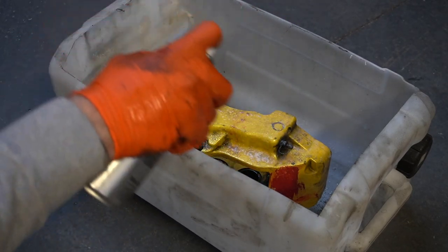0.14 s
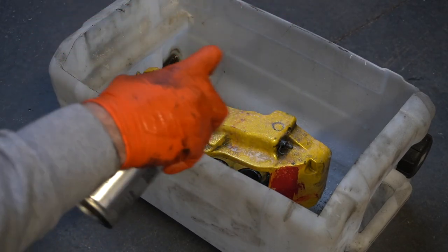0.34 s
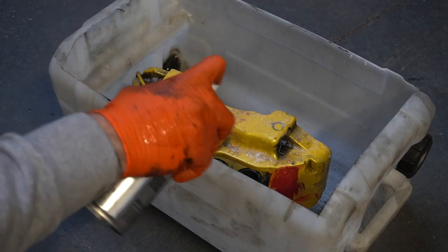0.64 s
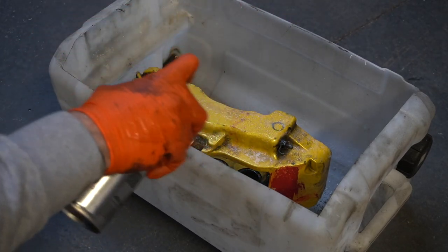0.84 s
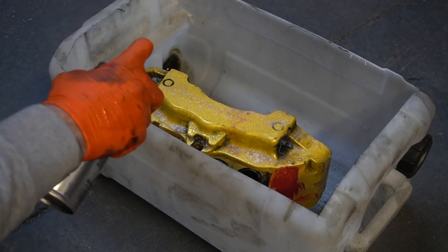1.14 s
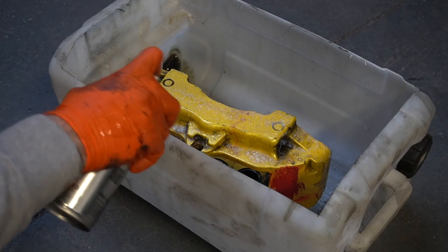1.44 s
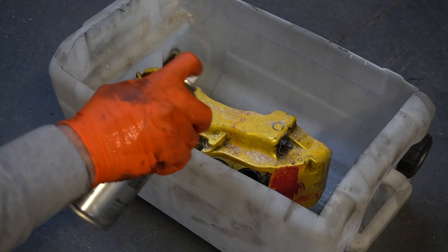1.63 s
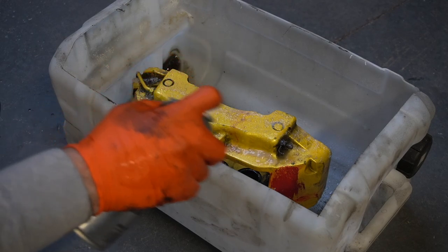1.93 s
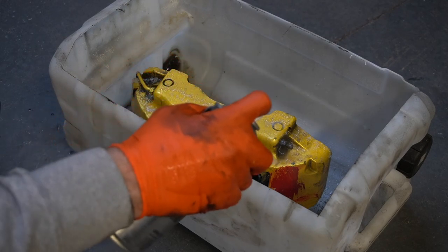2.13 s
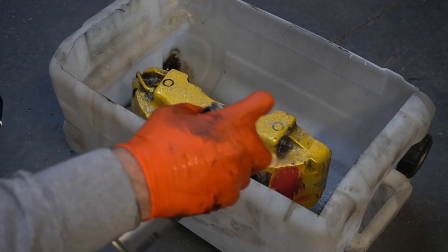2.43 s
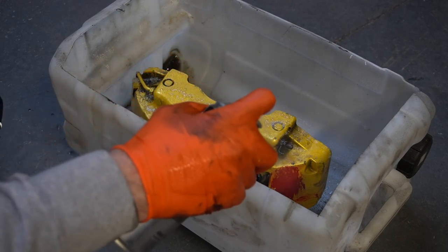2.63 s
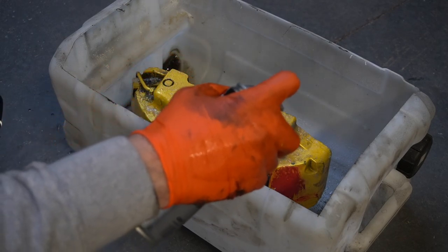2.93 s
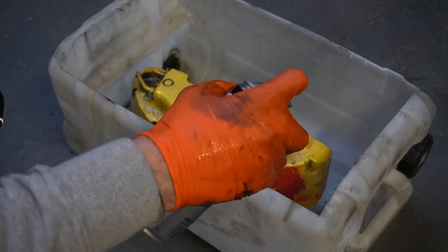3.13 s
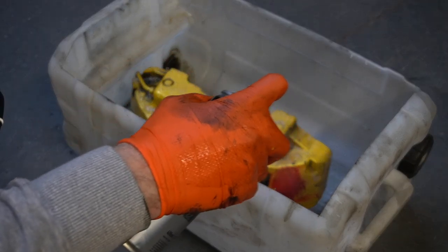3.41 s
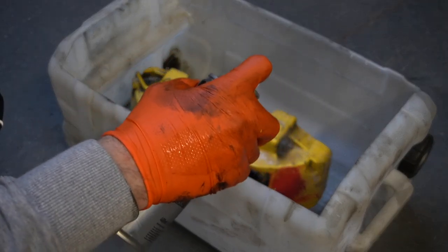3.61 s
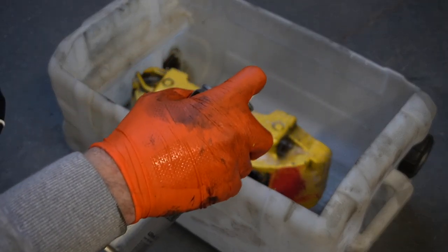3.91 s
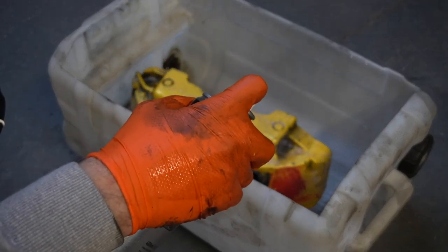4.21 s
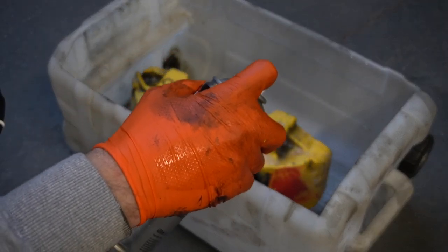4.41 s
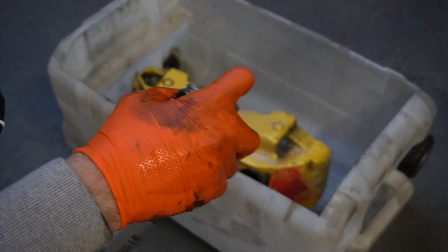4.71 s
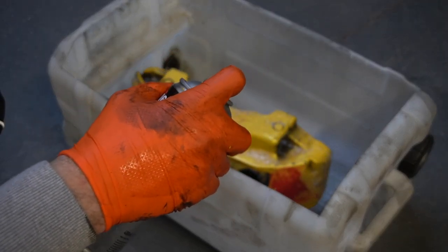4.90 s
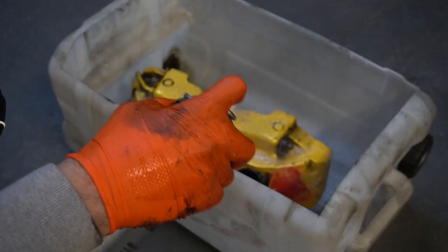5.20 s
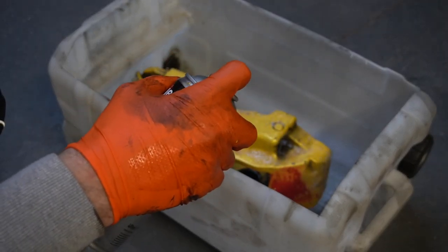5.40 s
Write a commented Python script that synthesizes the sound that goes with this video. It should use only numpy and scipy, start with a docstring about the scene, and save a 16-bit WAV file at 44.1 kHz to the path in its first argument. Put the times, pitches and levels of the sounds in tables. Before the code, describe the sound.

Close up in a small, quiet garage, an aerosol can sprays a metal brake caliper lying in a plastic tub. About twenty short bursts follow one another, roughly four a second, spacing out near the end. Each is a bright hiss with a slightly hollow rush and a brief room echo. The spray drifts from slightly left towards the centre over faint room air.

```python
"""A small, quiet garage; a stereo microphone pair close to a brake caliper lying in a plastic tub.
Over faint room air, an aerosol can of paint stripper starts dabbing, a little to the left: 22 short bursts.
In each, the can rings, the nozzle hisses, the jet rushes on the metal, and the garage rings on.
The tub walls return the sound along paths that shift as the hand sweeps towards the centre. Just after 2 s
the jet crosses a recess and the nozzle spits once; a low rumble swells under the last bursts."""
import sys
import numpy as np
from scipy import signal
from scipy.fft import rfft, irfft, next_fast_len
from scipy.io import wavfile
from scipy.ndimage import uniform_filter1d

SR = 44100
rng = np.random.default_rng(int(sys.argv[2]) if len(sys.argv) > 2 else 0)


def inscribe(sig):
    """Save sig as 16-bit PCM at rate SR to the path in sys.argv[1].

    A 1-D sig is mono; a 2-D sig holds one channel per row.
    Samples are clipped to [-1, 1] before scaling.
    """
    pcm = np.round(np.clip(np.atleast_2d(sig).T, -1, 1) * 32767)
    wavfile.write(sys.argv[1], SR, pcm.astype(np.int16))


N = 244755
TIME = np.arange(N) / SR
FREQ = np.maximum(np.arange(N // 2 + 1) * SR / N, 1)
LEFT_RIGHT = np.array([[1], [-1]])

# presses of the nozzle: valve opens t/s, valve closes t/s, level/dB
PRESSES = [(0.02, 0.133, -38.5), (0.3, 0.489, -39.5), (0.581, .713, -38.5), (0.81, 0.951, -39),
           (1.051, 1.172, -38.5), (1.246, 1.357, -38.5), (1.456, 1.568, -39.5), (1.758, 1.871, -39),
           (2.034, 2.166, -40), (2.365, 2.478, -40), (2.581, 2.67, -38.5), (2.77, 2.872, -39),
           (2.963, 3.084, -38), (3.194, 3.309, -38), (3.392, 3.504, -39), (3.605, 3.699, -38.5),
           (3.976, 4.081, -41.5), (4.235, 4.335, -40), (4.466, 4.584, -39), (4.675, 4.786, -38),
           (5.186, 5.29, -41.5), (5.466, 5.568, -39.5)]
# spectrum of the spray at the nozzle: f/Hz, level/dB
NOZZLE_SPECTRUM = [(700, -65), (1500, -24.5), (3000, -15.5), (4500, -11), (6200, -4.5), (8000, -1),
                   (10000, 0.2), (12500, -0.9), (14000, -2), (15200, 3.5), (16000, 0.5)]


def undb(db):
    """Decibels to gain."""
    return 10 ** (np.asarray(db) / 20)


def curve(points):
    """Gain per frequency from rows of f/Hz, level/dB, joined on a log axis."""
    hz, db = np.transpose(points)
    return undb(np.interp(np.log(FREQ), np.log(hz), db))


def hump(hz, width_hz):
    """Gain of a resonance, 1 at its centre."""
    return 1 / (1 + ((FREQ - hz) / width_hz) ** 2)


def noise(gain):
    """Noise of rms 1, shaped by a gain per frequency."""
    x = irfft(rfft(rng.standard_normal(N)) * gain, N)
    return x / x.std()


def flutter(rate_hz):
    """Smooth random wander of rms 1, up to about rate_hz."""
    return noise(1 / (1 + (FREQ / rate_hz) ** 4))


def filtered(x, gain):
    """A sound through a gain per frequency, padded with silence."""
    size = next_fast_len(N + SR // 4)
    freq = np.arange(size // 2 + 1) * SR / size
    return irfft(rfft(x, size) * np.interp(freq, FREQ, gain), size)[:N]


def room_tone(air_db=-75, wide_hz=3500, deep_db=-87, upper_db=-83):
    """Room air and microphone hiss over a faint rumble that wavers and swells, most in its deepest part."""
    # noise floor of the garage: f/Hz, level/dB
    floor_spectrum = [(20, -25), (45, -34), (85, -1.5), (150, 1.5), (230, -4.5), (400, -3.5), (650, -10),
                      (1200, -14), (4000, -16.5), (10000, -8.5), (16000, -17.5)]
    # swells of the deep rumble: middle t/s, half length/s, rise/dB
    swells = [(.8, 0.14, 6), (5.17, 0.45, 9)]
    colour = curve(floor_spectrum)
    side = filtered(noise(colour), 1.6 * np.sqrt(FREQ / (FREQ + wide_hz)))
    swell_db = sum(db * np.exp(-((TIME - at) / length) ** 2) for at, length, db in swells)
    rumble = undb(deep_db + swell_db) * noise(hump(hz=86, width_hz=20))
    rumble += undb(upper_db + 0.32 * swell_db) * noise(hump(hz=205, width_hz=60))
    air = undb(air_db) * (noise(colour) + LEFT_RIGHT * side)
    return air + rumble * undb(-0.6 * flutter(15))


def valve(opens, closes, first_share, build_s, shut_s, snap_s=0.0014, ease_s=0.0029):
    """Flow of one press: the valve snaps open, the jet builds, then the stem runs empty."""
    age = TIME - opens
    snap = 0.5 + 0.5 * np.tanh(age / (2 * snap_s))
    build = 1 - (1 - first_share) * np.exp(-np.maximum(age, 0) / build_s)
    since_closing = ease_s * np.logaddexp(0, (TIME - closes) / ease_s)
    return snap * build * np.exp(-since_closing / shut_s)


def can_ring(leak_db=-26, vary_db=2, lead_s=0.0062, leak_s=0.015):
    """Gas slips through just before the valve opens and rings the can briefly, more on some presses."""
    leak = 0
    for opens, _, db in PRESSES:
        gain = undb(db + leak_db + vary_db * rng.standard_normal())
        leak += gain * valve(opens - lead_s, opens, first_share=1, build_s=leak_s, shut_s=leak_s)
    return leak * noise(hump(hz=2270, width_hz=300))


def flow(first_share, build_s, shut_s):
    """Strength of the jet over time: every press follows the same valve law."""
    return sum(undb(db) * valve(opens, closes, first_share, build_s, shut_s)
               for opens, closes, db in PRESSES)


def hand_place():
    """Where the hand holds the can at each moment, in metres."""
    # the hand's sweep: t/s, place along the tub/m
    waypoints = [(0, .01), (.25, .13), (.5, .06), (.75, .1), (1.2, 0), (1.75, .08), (2.25, .19),
                 (3.25, .22), (4, .16), (4.5, .19), (4.75, .15), (5.55, .14)]
    return np.interp(TIME, *np.transpose(waypoints))


def droplets(per_second=2500, size_spread=0.38):
    """Tiny ticks of liquid breaking up and landing; rms 1."""
    ticks = (rng.random(N) < per_second / SR) * rng.standard_normal(N)
    ticks *= np.exp(size_spread * rng.standard_normal(N))
    patter = filtered(ticks, curve(NOZZLE_SPECTRUM))
    return patter / patter.std()


def nozzle_hiss(over_middle, gas_db=-0.83, drops_db=-7.5, sizzle_db=-11):
    """Gas and droplets hiss from the nozzle; at the tub's end the jet also sizzles."""
    sizzle_gain = undb(sizzle_db + 2 * flutter(3.1)) * (1 - over_middle)
    sizzle = sizzle_gain * noise(hump(hz=12900, width_hz=800))
    gas = undb(gas_db) * noise(curve(NOZZLE_SPECTRUM))
    hiss = gas + undb(drops_db) * droplets() + sizzle
    return flow(first_share=0.31, build_s=0.028, shut_s=0.016) * hiss


def hollow_rush(over_middle, rush_db=-12.5, middle_rise_db=2.5, between_db=-3.5, wander_db=1.6):
    """The jet rushes in the resonances of tub and cupped hand; each comes and goes with the can's aim."""
    # spectrum of the rush: f/Hz, level/dB
    rush_spectrum = [(600, -23.5), (950, -9), (1300, -6.5), (1900, 0), (2700, -2), (3500, -4), (6000, -11),
                     (9000, -12.5)]
    # hollow resonances: f/Hz, width/Hz, level at the tub's end/dB, level over its middle/dB
    resonances = [(1230, 114, 2, -6.5), (1398, 98, 4, 3), (1534, 127, 1.5, 1), (2040, 200, 3, -19),
                  (2313, 150, 1, 6), (2858, 187, 4, 2.5), (3348, 230, 7, 5.5), (3940, 360, 2, -1.5),
                  (4490, 500, 9, 7), (4986, 190, 12.5, 10), (5740, 240, 10, 5.5)]
    colour = curve(rush_spectrum)
    rush = undb(between_db) * np.linalg.norm(colour) * noise(colour)
    for hz, width_hz, end_db, middle_db in resonances:
        band = colour * hump(hz, width_hz)
        db = end_db + (middle_db - end_db) * over_middle + wander_db * flutter(6.4)
        rush += undb(db) * np.linalg.norm(band) * noise(band)
    rush *= undb(rush_db + middle_rise_db * over_middle) / rush.std()
    return flow(first_share=0.29, build_s=0.037, shut_s=0.012) * rush


def metal_splash(splash_db=-32):
    """Liquid lands on the caliper with a low splash, slower to build and fade than the hiss."""
    # spectrum of the splash: f/Hz, level/dB
    splash_spectrum = [(100, -30), (220, 8), (370, 1.5), (470, 4), (660, -2.5), (900, -3), (2000, -15)]
    splash = undb(splash_db) * noise(curve(splash_spectrum))
    return flow(first_share=0.24, build_s=0.084, shut_s=0.04) * splash


def spray(end_m=0.072, middle_m=0.15, sputter_db=0.5, waver_db=0.47):
    """Hiss, rush and splash waver together as gas and liquid leave the nozzle unevenly."""
    over_middle = np.clip((hand_place() - end_m) / (middle_m - end_m), 0, 1)  # 0 at the tub's end
    jet = nozzle_hiss(over_middle) + hollow_rush(over_middle) + metal_splash()
    return jet * undb(sputter_db * flutter(300) + waver_db * flutter(27))


def tub_echoes(jet, echo_db, nearest_s, farthest_s, fade_s, port_s, sweep, count, oversample=8):
    """Direct sound plus echoes off tub, metal and floor; the hand shifts their paths, moving the comb."""
    travel_s = uniform_filter1d(hand_place(), SR // 10) / 343  # sound travels at 343 m/s
    fine = signal.resample_poly(jet, oversample, 1)
    scatter, lean = rng.random((count, 2)).T
    delays = nearest_s * (farthest_s / nearest_s) ** ((np.arange(count) + scatter) / count)
    gains = np.exp(-delays / fade_s)
    gains *= undb(echo_db) / np.linalg.norm(gains)
    bearings = rng.permutation(np.linspace(-1, 1, count))
    pair = np.array([jet, jet])
    for delay, gain, bearing, slant in zip(delays, gains, bearings, 2 * lean - 1):
        # an echo from the side reaches one microphone port a moment before the other
        lag = delay + sweep * slant * travel_s + LEFT_RIGHT * bearing * port_s / 2
        index = ((TIME - lag) * SR * oversample).astype(int)
        pair += gain * fine[np.clip(index, 0, len(fine) - 1)]
    return pair / np.hypot(1, undb(echo_db))


def garage_ring(jet, wet_db=-8.5, gap_s=0.0083, wide_hz=4000, dull_hz=14000, spread=1.77, size=32768):
    """Diffuse ring of the room: longest in the middle range, shorter and wider in the treble."""
    # reverberation of tub and garage: f/Hz, t60/s, level/dB
    bands = [(302, 0.55, 1.5), (1100, 0.45, 4.5), (1660, 0.48, 5), (2160, 0.6, -1.5), (4900, 0.5, 0),
             (10100, 0.4, -3.5), (15000, 0.39, -5.5)]
    t = np.arange(size) / SR
    freq = np.maximum(np.arange(size // 2 + 1) * SR / size, 1)
    mid, side = rfft(rng.standard_normal((2, size)))
    width = spread * freq / np.hypot(freq, wide_hz)
    field = (mid + LEFT_RIGHT * width * side) / np.hypot(1, freq / dull_hz)
    onset = np.clip(t / gap_s - 1, 0, 1)
    log_centres = np.log(np.array(bands)[:, 0])
    response = 0
    for (_, t60, db), this_band in zip(bands, np.eye(len(bands))):
        band = np.interp(np.log(freq), log_centres, this_band)
        decay = onset * np.exp(-np.log(1000) * t / t60)
        response += undb(db) * irfft(field * band, size) * decay / np.linalg.norm(decay)
    return undb(wet_db) * signal.fftconvolve(jet[None], response, axes=1)[:, :N]


def recess_roar(at_s=2.135, length_s=0.04, roar_db=-62, low_cut_hz=130):
    """The jet crosses a recess in the caliper and turns throaty for a moment."""
    colour = hump(hz=1120, width_hz=560) * FREQ / np.hypot(FREQ, low_cut_hz)
    return undb(roar_db) * np.exp(-((TIME - at_s) / length_s) ** 2) * noise(colour)


def nozzle_spit(length_s=0.0001, bright_hz=12500):
    """A blob of liquid leaves the nozzle with a tiny bright tick."""
    # the blob: t/s, peak level/dB
    blobs = [(2.402, -25)]
    at_s, db = blobs[0]
    age = TIME - at_s
    return undb(db) * np.exp(-(age / length_s) ** 2) * np.cos(2 * np.pi * bright_hz * age)


def scene(centre_m=0.16, pan_db_per_m=10.0, near_db=3.0, screen_hz=2800):
    """Close up in the garage, the can moves from a little left of the microphones to about dead ahead."""
    jet = spray() + can_ring() + recess_roar()
    # the hand screens the treble, so much of it arrives by way of the tub; longer waves bend round it
    treble = filtered(jet, FREQ ** 6 / (FREQ ** 6 + screen_hz ** 6))
    near = tub_echoes(treble, echo_db=3.0, nearest_s=0.0008, farthest_s=0.008,
                      fade_s=0.026, port_s=0.000085, sweep=1.095, count=16)
    near += tub_echoes(jet - treble, echo_db=-7.0, nearest_s=0.001496, farthest_s=0.015,
                       fade_s=0.027, port_s=0.00009, sweep=1.96, count=20)
    pan_db = pan_db_per_m * (centre_m - hand_place())
    near *= undb(near_db + LEFT_RIGHT * pan_db / 2)
    return near + nozzle_spit() + garage_ring(jet) + room_tone()


def record(dry, top_hz=15750):
    """The microphone pair is narrow in the bass and uneven in width above; the top is cut steeply."""
    # stereo width of the pair: f/Hz, side gain/dB
    side_gains = [(60, -19), (200, -5), (500, -1), (1000, 0.5), (1550, -1.5), (1900, -2), (2300, -13.5),
                  (2650, -4.5), (3500, -8), (6000, -5), (9000, -4), (13000, -1.5), (15500, -10)]
    side = filtered((dry[0] - dry[1]) / 2, curve(side_gains))
    top_cut = signal.ellip(12, 0.2, 70, top_hz, fs=SR, output="sos")
    return signal.sosfilt(top_cut, dry.mean(axis=0) + LEFT_RIGHT * side)


dry = scene()
out = record(dry)
inscribe(out)
```